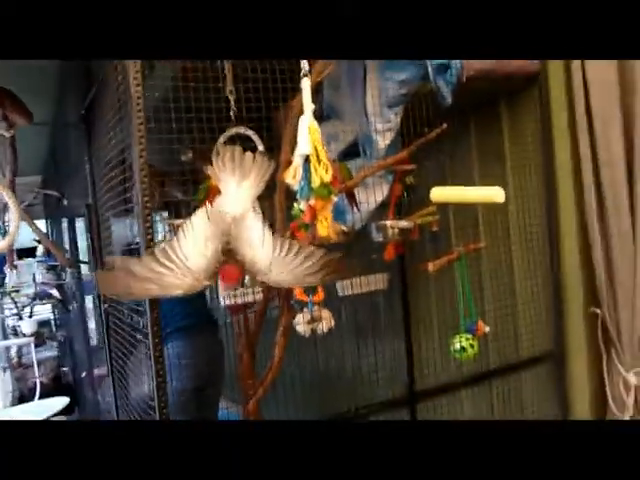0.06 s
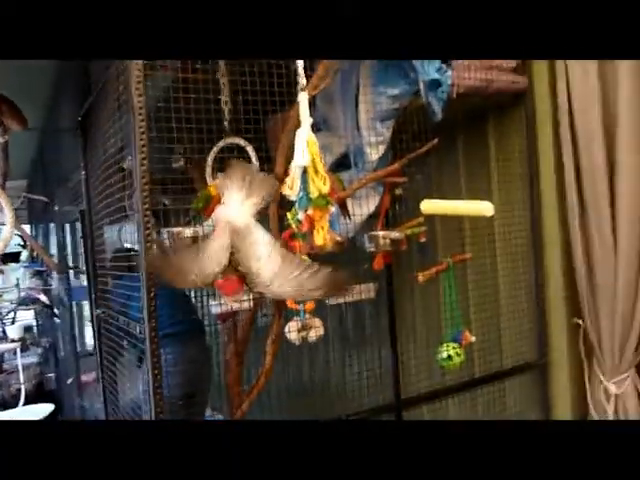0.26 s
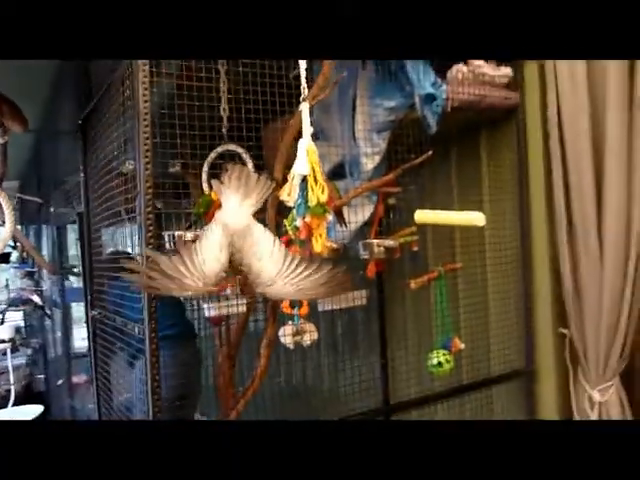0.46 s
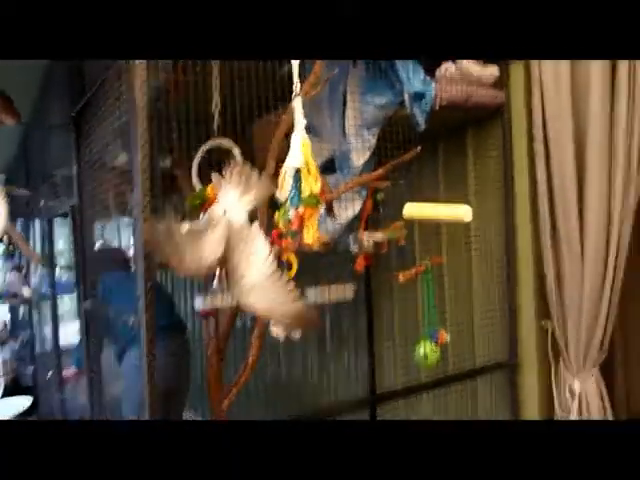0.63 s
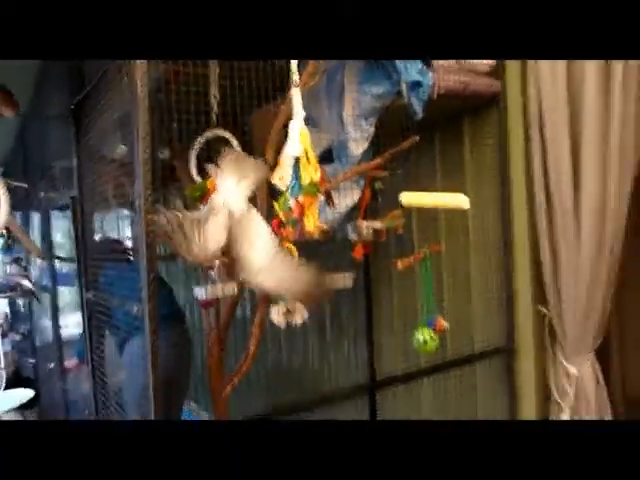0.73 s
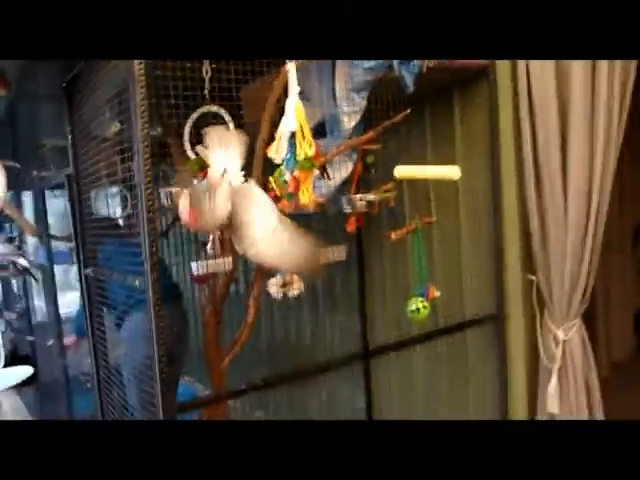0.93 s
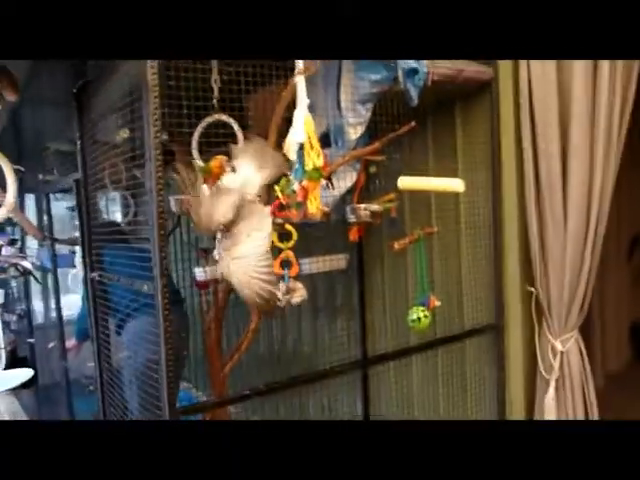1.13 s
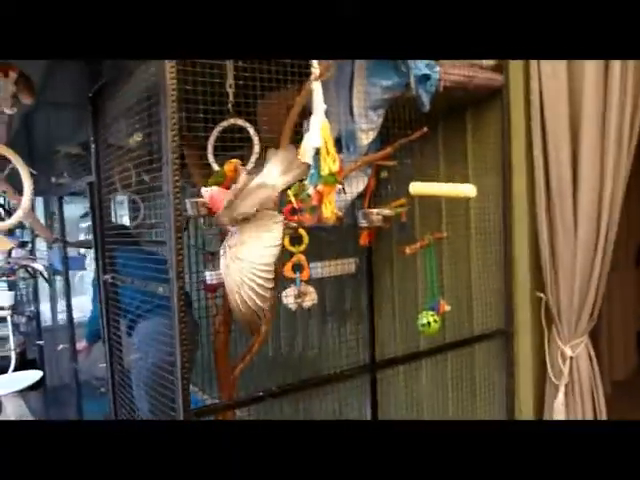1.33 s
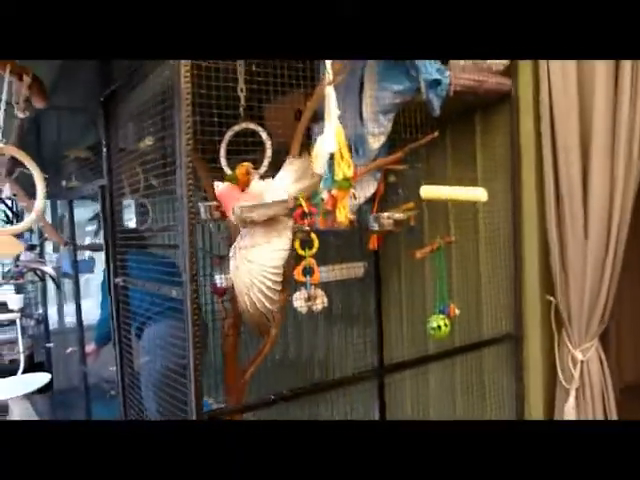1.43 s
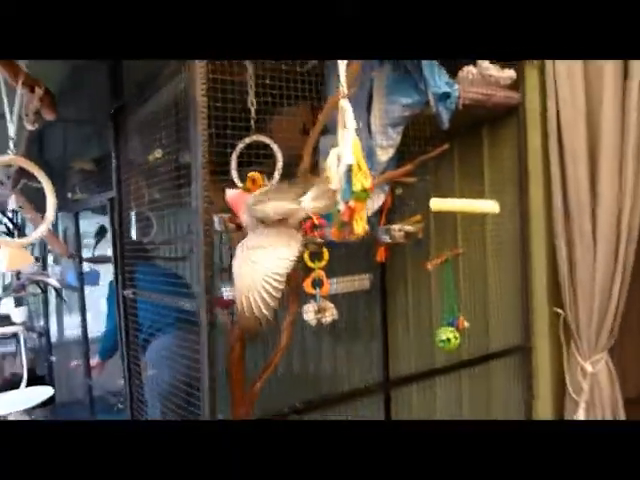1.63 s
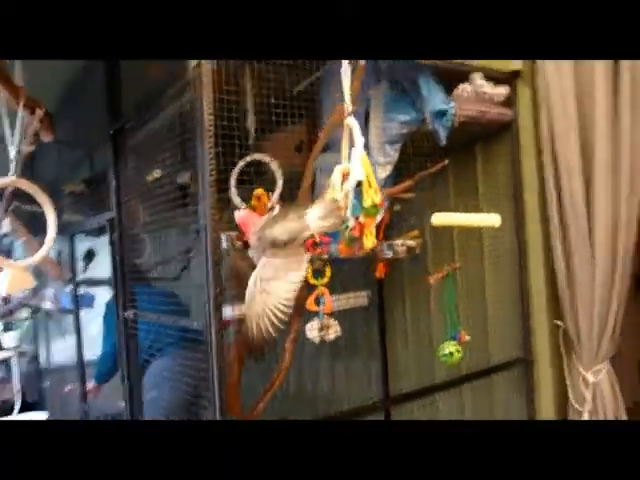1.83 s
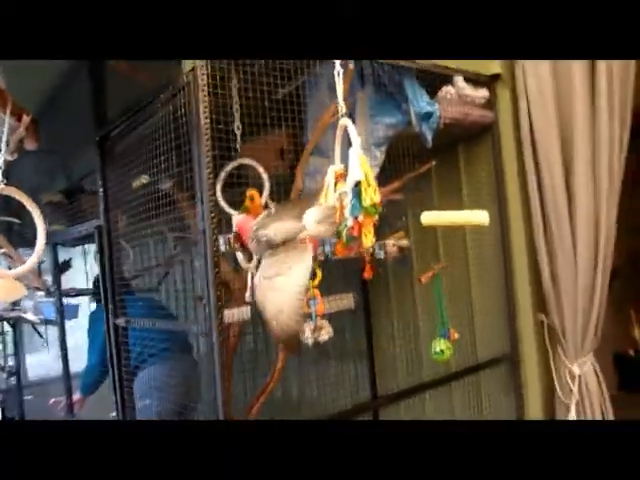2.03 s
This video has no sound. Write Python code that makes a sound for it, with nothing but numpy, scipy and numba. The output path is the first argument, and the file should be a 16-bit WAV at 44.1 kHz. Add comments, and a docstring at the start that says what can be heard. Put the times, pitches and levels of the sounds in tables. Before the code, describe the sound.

Wet parrot wings flutter and rustle rapidly indoors, broken by a harsh squawk and sharp yelp

```python
"""Wet parrot shaking its wings

A wet parrot shakes its wings in a wire cage, in a live room with other parrots.
Noise coloured by filters makes the wing air and the rustle of feathers. Over it come two thin
chirps and a sharp upward yelp (stacked sine waves), a rising rasp (noisy puffs), a soft cluck (one
sine wave) and a harsh squawk (rattling pulses). A mono microphone's gain ducks under the loud calls."""
import sys
import numpy as np
from scipy import signal
from scipy.fft import rfft, irfft, next_fast_len
from scipy.io import wavfile
from scipy.ndimage import uniform_filter1d
from numba import njit

SR = 44100
rng = np.random.default_rng(int(sys.argv[2]) if len(sys.argv) > 2 else 0)


def waveform_to_disk(signal):
    """Save audio, clipped to [-1, 1], as 16-bit WAV at the path in sys.argv[1]."""
    frames = np.transpose(np.atleast_2d(signal))
    scaled = np.clip(frames, -1, 1) * 32767
    samples = np.round(scaled).astype(np.int16)
    wavfile.write(sys.argv[1], SR, samples)


N = 91419
TIME = np.arange(N) / SR  # s
CUTOFF_HZ = 14300  # top of the microphone's range; the chirps and the yelp put no partials above it


def from_db(db):
    """Turn decibels into a gain."""
    return 10 ** (np.asarray(db) / 20)


def rms_one(x):
    """Scale a sound to an average (rms) level of 1."""
    return x / np.sqrt(np.mean(x ** 2) + 1e-20)


def in_time(rows):
    """Draw straight lines between a table's rows, giving each column at every sample."""
    seconds, *columns = np.transpose(rows)
    return [np.interp(TIME, seconds, column) for column in columns]


def gate(rows, fade_s=0.012):
    """Fade in just before a table's first time and out just after its last."""
    nearest_end_s = np.minimum(TIME - rows[0][0], rows[-1][0] - TIME)
    return np.clip(nearest_end_s / fade_s + 1, 0, 1)


def at_hz(points, hz):
    """Read a table at any frequency, spacing frequencies by ratio as the ear does."""
    f, values = np.transpose(points)
    return np.interp(np.log(np.maximum(hz, 1)), np.log(f), values)


def colour(x, spectrum):
    """Make some frequencies louder than others by a table, then scale to rms 1."""
    size = next_fast_len(2 * N)
    gains = from_db(at_hz(spectrum, np.fft.rfftfreq(size, 1 / SR)))
    return rms_one(irfft(rfft(x, size) * gains, size)[:N])


def noise():
    """Plain white noise, the raw material of rushing air."""
    return rng.standard_normal(N)


def drift(rate_hz):
    """Smooth random wandering of rms 1; a higher rate wanders faster."""
    r = np.exp(-2 * np.pi * rate_hz / SR)
    wander = signal.lfilter([1], [1, -2 * r, r * r], rng.standard_normal(N + SR))
    return rms_one(wander[SR:])  # the first second lets the filter settle


def phase_of(hz):
    """Add up a moving frequency into the running angle of its wave."""
    return 2 * np.pi * np.cumsum(hz) / SR


def high_pass(x, hz, order):
    """Remove the sound below a frequency."""
    return signal.sosfilt(signal.butter(order, hz, "high", fs=SR, output="sos"), x)


def wing_beat():
    """The wings beat quickly and unevenly, so their loudness swells and sinks."""
    mean_beats_per_s, depth_db = 13, 1.5
    beats_per_s = mean_beats_per_s * (1 + 0.2034 * drift(2.5))
    return from_db(depth_db * np.sin(phase_of(beats_per_s)))


def feather_rustle(beat):
    """Wet feathers flick against each other: random clicks mixed with steady noise."""
    # loudness of the rustle before the beat: t/s, level/dB
    rustle_level = [(0, -35.5), (.2, -32.5), (.4, -36.5), (.7, -38.5), (.95, -41), (1.2, -41.5),
                    (1.38, -39.5), (1.52, -37), (1.62, -39.5), (1.72, -38.5), (2.07, -35.5)]
    # tone colour of the rustle: f/Hz, level/dB
    rustle_colour = [(100, -57), (800, -14.5), (2000, 1), (4000, 1.5), (6000, 1), (7700, -5), (8800, -0.5),
                     (10000, -4.5), (11800, -2), (13500, -8.5), (14500, -12.5)]
    flicks_per_s, flick_share, spread_db = 520, 0.28, 2.0  # the beat makes flicks more or less frequent
    (db,) = in_time(rustle_level)
    happens = rng.random(N) < flicks_per_s * beat / SR
    strength = from_db(spread_db * np.minimum(rng.exponential(1, N), 4))
    flicks = happens * rng.choice([-1, 1], N) * strength
    rustle = colour(flick_share * rms_one(flicks) + noise(), rustle_colour)
    return beat * from_db(db) * rustle


def wing_air(beat):
    """The beating wings push air, heard as a low, soft rush."""
    # loudness of the air before the beat: t/s, level/dB
    air_level = [(0, -47), (.05, -39), (.12, -47), (.3, -50), (.6, -48), (.66, -43.5), (.73, -53.5),
                 (.79, -34.5), (.88, -46.5), (1.05, -39), (1.2, -37.5), (1.45, -37.5), (1.53, -38),
                 (1.6, -40.5), (1.74, -40.5), (1.85, -43.5), (2.07, -36)]
    # tone colour of the air: f/Hz, level/dB
    air_colour = [(30, -42), (80, -27), (150, -17), (240, -7), (330, -7), (500, -1), (800, -1.5),
                  (1100, -4), (2000, -10), (4000, -14), (14000, -58)]
    (db,) = in_time(air_level)
    return beat * from_db(db) * colour(noise(), air_colour)


def strokes():
    """Each single strong wing stroke is one short, low whoosh."""
    # the strong strokes: t/s, level/dB
    stroke_list = [(0.024, -43), (.655, -45), (0.702, -40), (0.733, -35), (0.783, -38.5)]
    # tone colour of a stroke: f/Hz, level/dB
    stroke_colour = [(60, -41), (170, -30), (250, -0.5), (340, -8.5), (520, 5.5), (700, -3.5), (1000, -5),
                     (1500, -6), (3000, -25), (14000, -50)]
    width_s = 0.015
    swell = sum(from_db(db) * np.exp(-.5 * ((TIME - s) / width_s) ** 2) for s, db in stroke_list)
    return swell * colour(noise(), stroke_colour)


def chirp(pitch, effort, throat, jitter, flutter_db, noise_db, even_db):
    """Ten partials shaped by the throat; roughness shakes the pitch, flutters each partial and adds hiss."""
    partial_loss_db = 0.5  # from each partial to the next
    (hz,), (db, rough) = in_time(pitch), in_time(effort)
    phase = phase_of(hz * (1 + jitter * rough * drift(566)))
    orders = np.arange(1, 11)[:, None]
    # even_db sets the even partials above or below the odd ones
    source_db = even_db * (orders % 2 == 0) - partial_loss_db * orders
    gains = from_db(at_hz(throat, orders * hz) + source_db) * (orders * hz < CUTOFF_HZ)
    own_drifts = np.array([drift(180) for _ in orders])
    flutter = from_db(flutter_db * rough * np.tanh(0.2 * drift(270) + own_drifts))
    partials = np.sum(gains * flutter * np.sin(orders * phase), axis=0)
    tone = partials / np.sqrt(np.sum(gains ** 2, axis=0) / 2)
    hiss = colour(noise() * (1 + np.cos(phase)), throat)  # air pulsing with the voice
    call = gate(effort) * from_db(db) * (tone + from_db(noise_db) * rough * hiss)
    return high_pass(call, 700, order=2)


def yelp():
    """A sharp call that leaps upward, its partials fluttering most where it is rough."""
    # pitch: t/s, f/Hz
    pitch = [(1.752, 960), (1.764, 1278), (1.775, 1503), (1.784, 1662), (1.797, 1870), (1.805, 2128),
             (1.814, 2211), (1.835, 2119)]
    # effort before the mix: t/s, level/dB, roughness (0 to 1)
    effort = [(1.754, -31, 0.24), (1.764, -19.5, 0.59), (1.784, -13, 0.5), (1.801, -5, 0.2),
              (1.82, -5.5, 0.13), (1.833, -12.5, 0.33)]
    # throat resonances: f/Hz, level/dB
    throat = [(900, -3), (1600, -10), (2200, -3), (3400, 3.5), (4400, 3.5), (5500, 0), (6600, -2.5),
              (7400, -8.5), (8700, -4.5), (10500, -6.5), (13000, -14), (15000, -37)]
    return chirp(pitch, effort, throat, jitter=0.0774, flutter_db=15, noise_db=-4, even_db=3.5)


def squawk(jitter=.04, noise_db=-2, rattle_db=4.5, rattle_hz=450, second_db=-27):
    """Unsteady pulses and a rush of air rattle through a wide-open throat, over a faint second partial."""
    # course of the call before the mix: t/s, pitch f/Hz, level/dB
    course = [(.772, 674.6, -29), (.786, 694, -23), (.808, 706.2, -9), (.828, 699.7, -10),
              (.89, 689.6, -10.5), (.94, 667.2, -16), (.975, 628, -20.5), (1.01, 650, -31)]
    # throat resonances: f/Hz, level/dB
    throat = [(250, -54), (560, -12.5), (700, -24), (1120, -10.5), (1380, -10), (1750, -10.5), (2250, -1),
              (2750, 7), (3280, 4.5), (3650, 0), (4450, 3.5), (4850, -3), (5600, -5.5), (6100, -14),
              (6900, -14), (7800, -24.5), (9350, -18), (10300, -40), (11200, -24), (12200, -53)]
    hz, db = in_time(course)
    phase = phase_of(hz * (1 + jitter * drift(438.4)))
    pulses = rms_one(sum(np.cos(k * phase) for k in range(1, 20)))
    rush = rms_one(noise() * (1 + np.cos(phase)))
    rattle = from_db(rattle_db * np.tanh(drift(rattle_hz)))
    source = (pulses + from_db(noise_db) * rush) * rattle
    second = from_db(second_db) * (1 + 0.91 * drift(60)) * np.sin(2 * phase)  # wavers in loudness
    return gate(course, fade_s=.001) * from_db(db) * (colour(source, throat) + second)


def cage_scatter(x):
    """Close reflections in the cage smear each pulse without colouring it (all-pass filters)."""
    # spacing of the reflections: t/s
    spacings = (.0004, .0007)
    for s in spacings:
        a = np.r_[1, np.zeros(int(s * SR)), 0.5]
        x = signal.lfilter(a[::-1], a, x)
    return x


@njit
def moving_resonance(x, poles):
    """Ring at one resonance whose centre and width change at every sample."""
    out, state = np.zeros(len(x)), 0j
    for i in range(len(x)):
        state = poles[i] * state + x[i] * np.sqrt(1 - abs(poles[i]) ** 2)
        out[i] = state.real
    return out


def rasp(unevenness=.3, puff_decay=0.99, wobble=0.016, tightening=2.55, edge_loss=0.62):
    """Uneven puffs excite a broad rising resonance that tightens into a hoarse whistle."""
    # course of the call before the mix: t/s, throat resonance f/Hz, level/dB
    course = [(.32, 1100, -35.5), (.345, 1400, -31.5), (.375, 1850, -29), (.405, 2498, -25.5),
              (.45, 2528, -24), (.49, 2630, -25.5), (.525, 2796, -23), (.545, 2740, -42)]
    # tone colour of the noisy edge: f/Hz, level/dB
    edge_colour = [(400, -52), (750, -5), (1100, 12), (1500, 17.5), (2200, 21.5), (3300, 9), (4200, 19.5),
                   (5500, 4), (7500, -44), (14000, -51)]
    mean_puffs_per_s = 170
    loose_width_hz, tight_width_hz = 1000, 160
    low_hz, low_width_hz = 1083, 190
    ring_db, low_db, whistle_db, edge_db = -3, -5.5, -2, -2  # balance of the four parts
    hz, db = in_time(course)
    cycle = phase_of(mean_puffs_per_s * (1 + unevenness * drift(90))) / (2 * np.pi) % 1
    puffs = rms_one(uniform_filter1d(np.exp(-puff_decay * cycle), size=24))
    air = puffs * noise()
    focus = (hz / hz.max()) ** tightening  # 1 when the throat is tightest
    width = loose_width_hz + focus * (tight_width_hz - loose_width_hz)
    ring = moving_resonance(air, np.exp((2j * hz - width) * np.pi / SR))
    # a low resonance fades as the throat tightens
    b, a = signal.iirpeak(low_hz, low_hz / low_width_hz, fs=SR)
    low = (1 - focus) * rms_one(signal.lfilter(b, a, puffs * noise()))
    whistle = focus * np.sin(phase_of(hz * (1 + wobble * drift(330)))) * np.sqrt(2) * puffs
    body = from_db(ring_db) * ring + from_db(low_db) * low + from_db(whistle_db) * whistle
    edge = from_db(edge_db) * (1 - edge_loss * focus) * colour(air, edge_colour)
    return gate(course) * from_db(db) * (high_pass(body, 750, order=4) + edge)


def cluck():
    """A soft cluck is one short, nearly pure note with a falling pitch."""
    # course of the note before the mix: t/s, pitch f/Hz, level/dB
    course = [(.53, 800, -69), (.54, 782, -33.5), (.555, 700, -54)]
    hz, db = in_time(course)
    return gate(course) * from_db(db) * np.sin(phase_of(hz))


def far_chirps():
    """Two thin chirps from farther off: a rough one, then a clearer one that rises."""
    # pitch of each chirp: t/s, f/Hz
    first_pitch = [(0, 1898), (.03, 1927), (.07, 1825)]
    second_pitch = [(.10, 2425), (.122, 2495), (.136, 2930), (.165, 2827), (.188, 3210), (.2, 3290)]
    # effort of each chirp before the mix: t/s, level/dB, roughness (0 to 1)
    first_effort = [(0, -28.5, 0.65), (.035, -34.5, 0.52), (.07, -41, 0.4)]
    second_effort = [(.10, -40, 0.22), (0.136, -22, 0.13), (0.169, -23, 0.33), (0.198, -30, 0.13)]
    # throat resonances of both: f/Hz, level/dB
    throat = [(1000, -48), (1900, -15), (3000, 6), (3900, 4), (4800, -10), (5700, -6.5), (6800, -13),
              (8700, -12.5), (10000, -28), (11500, -14), (13000, -27), (15000, -12)]
    first = chirp(first_pitch, first_effort, throat, jitter=.12, flutter_db=5, noise_db=-3.5, even_db=-5)
    second = chirp(second_pitch, second_effort, throat, jitter=0.1, flutter_db=1, noise_db=-11, even_db=3.5)
    return first + second


def far_echo(x):
    """A sound returns once, late, faint and duller."""
    delay_s, level_db = 0.11, -22
    late = np.interp(TIME - delay_s, TIME, x)
    return from_db(level_db) * signal.lfilter([.4], [1, -.6], late)


def room(x):
    """Dense reflections, built from bands of noise that each die away at their own speed."""
    # time to fade by 60 dB: f/Hz, t/s
    fade_times = [(200, 1), (1000, 0.65), (3000, 0.49), (6000, 0.67), (13000, 0.16)]
    delay_s = 0.0018  # silent until here, then fading in over as long again
    t, edges = TIME[:SR], np.geomspace(100, 16000, 9)
    tail = 0
    for low, high in zip(edges, edges[1:]):
        band_filter = signal.butter(2, [low, high], "band", fs=SR, output="sos")
        band = signal.sosfilt(band_filter, rng.standard_normal(SR))
        tail = tail + band * from_db(-60 * t / at_hz(fade_times, np.sqrt(low * high)))
    tail = tail * np.clip(t / delay_s - 1, 0, 1)
    return signal.fftconvolve(x, tail / np.sqrt(np.sum(tail ** 2)))[:N]


def rumble():
    """A very faint, steady low noise lies under everything."""
    # tone colour: f/Hz, level/dB
    rumble_colour = [(25, -2), (60, 2), (120, -16), (400, -35), (2000, -70)]
    return from_db(-66) * colour(noise(), rumble_colour)


def scene():
    """Mix the wings with the calls; the farther calls carry more of the room than the near ones."""
    beat = wing_beat()
    shaking = feather_rustle(beat) + wing_air(beat) + strokes()
    far, sharp = far_chirps(), yelp()
    harsh = rasp() + cage_scatter(squawk()) + cluck()
    direct = from_db(-1) * far + from_db(1.5) * harsh + from_db(-2.5) * sharp
    sent_to_room = from_db(4) * far + harsh + from_db(-2) * sharp
    calls = direct + far_echo(sharp) + from_db(-5) * room(sent_to_room)
    mono = shaking + calls + rumble()
    return np.array([mono, mono])


def record(dry):
    """A microphone with a narrow dip and little bass, a gain that ducks and recovers slowly, a top cut."""
    notch_hz, notch_width_hz, low_cut_hz = 2899, 250, 123
    knee_db, slope, recovery_db_per_s, attack_s = -20, 0.63, 10, 0.0065
    b, a = signal.iirnotch(notch_hz, notch_hz / notch_width_hz, fs=SR)
    x = high_pass(signal.lfilter(b, a, dry), low_cut_hz, order=2)
    level_db = 10 * np.log10(np.abs(uniform_filter1d(x[0] ** 2, size=256)) + 1e-12)
    over_db = slope * np.maximum(level_db - knee_db, 0)
    # each peak of the reduction is held, then let go at the recovery speed
    recovered_db = recovery_db_per_s * TIME
    held_db = np.maximum.accumulate(over_db + recovered_db) - recovered_db
    r = np.exp(-1 / (attack_s * SR))
    x = x * from_db(-signal.lfilter([1 - r], [1, -r], held_db))
    return signal.sosfilt(signal.ellip(10, .2, 80, CUTOFF_HZ, fs=SR, output="sos"), x)


dry = scene()
out = record(dry)
waveform_to_disk(out)
```